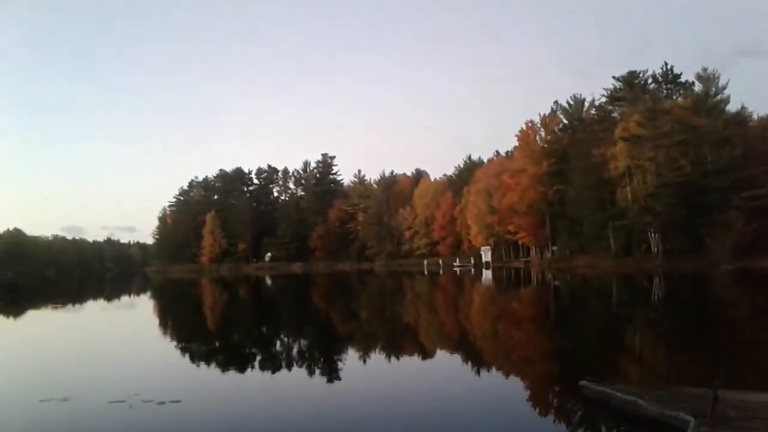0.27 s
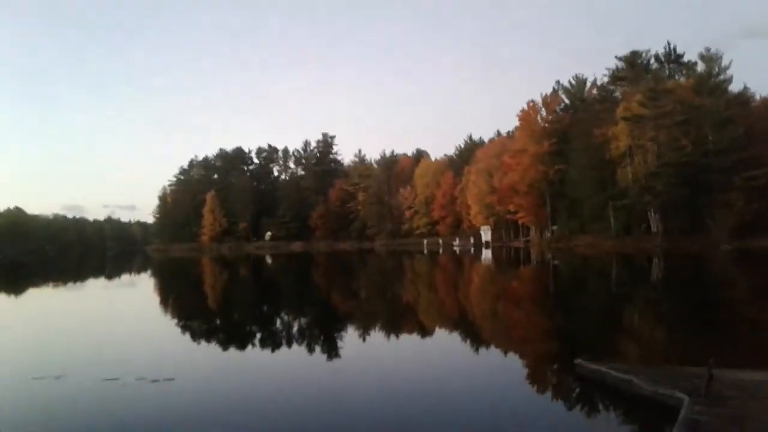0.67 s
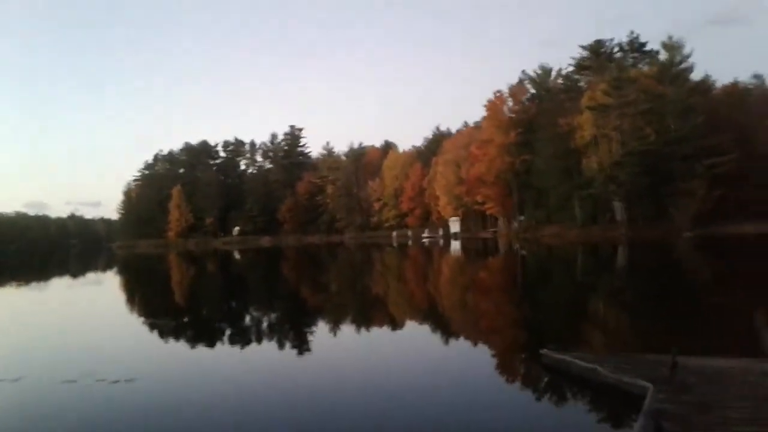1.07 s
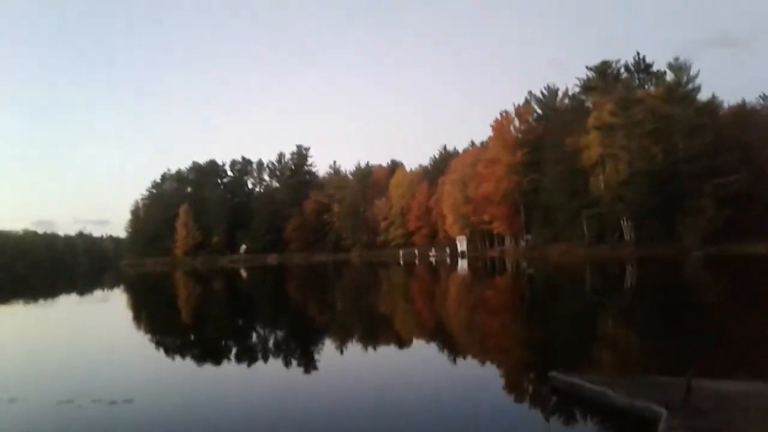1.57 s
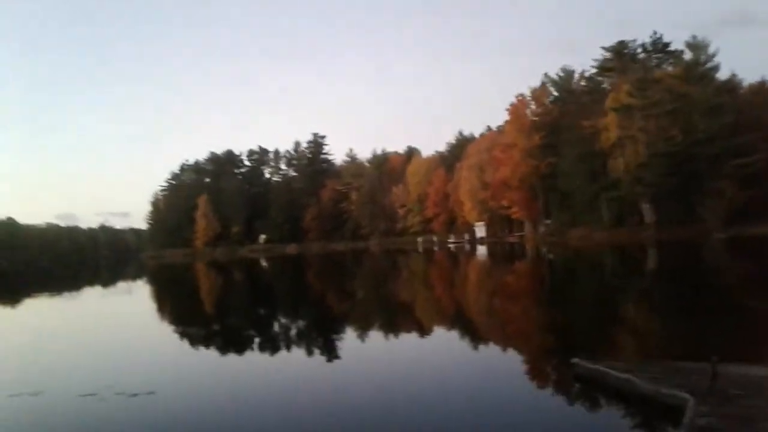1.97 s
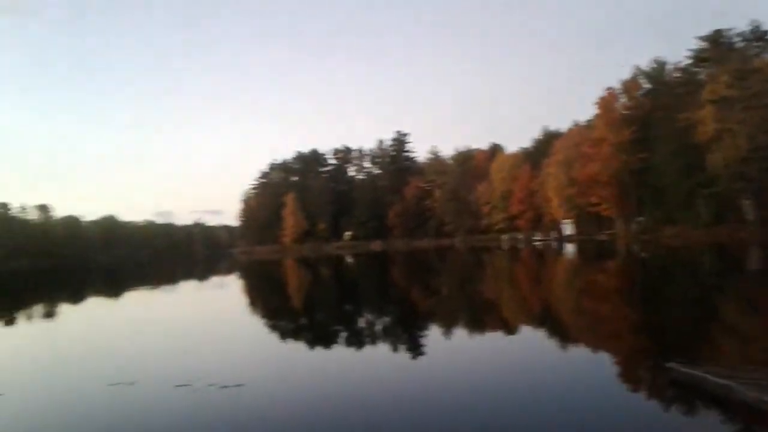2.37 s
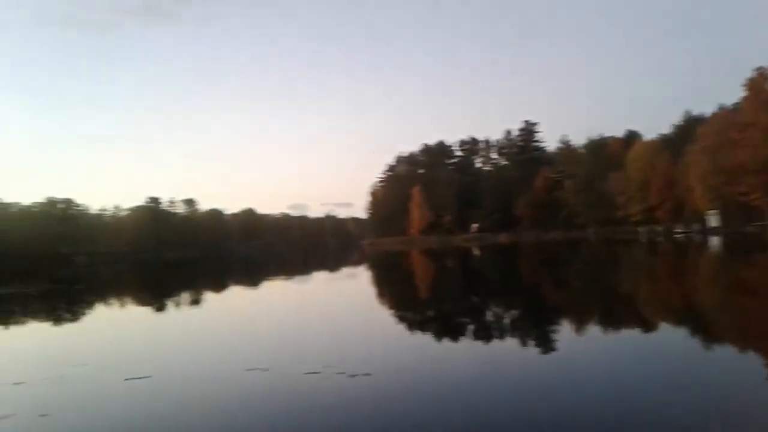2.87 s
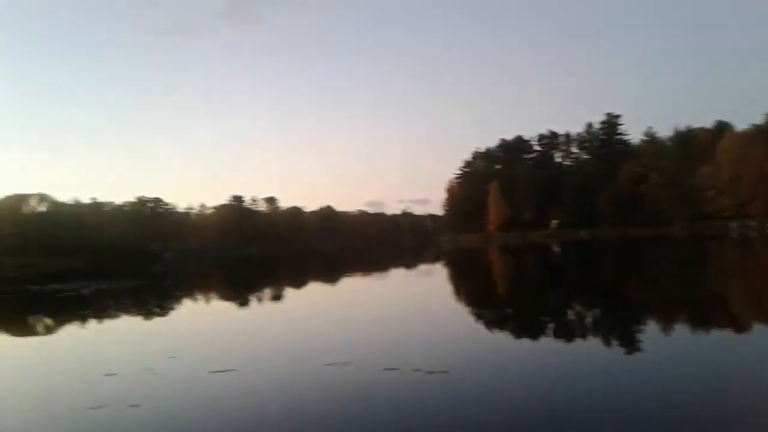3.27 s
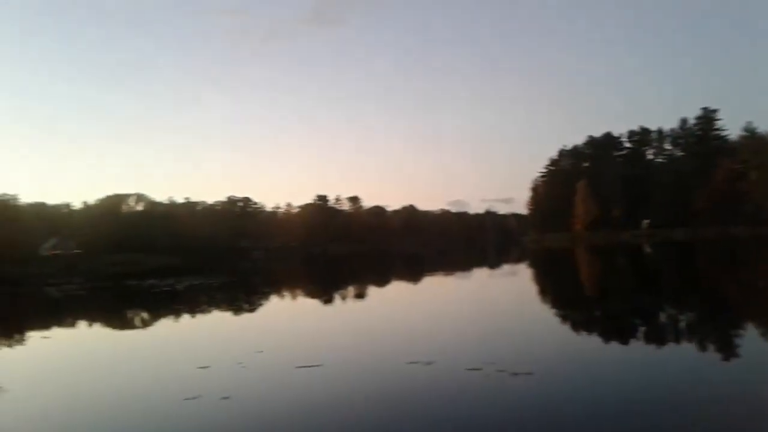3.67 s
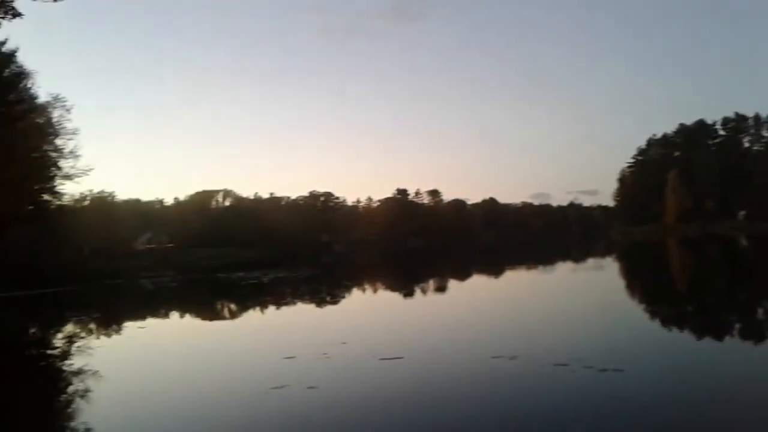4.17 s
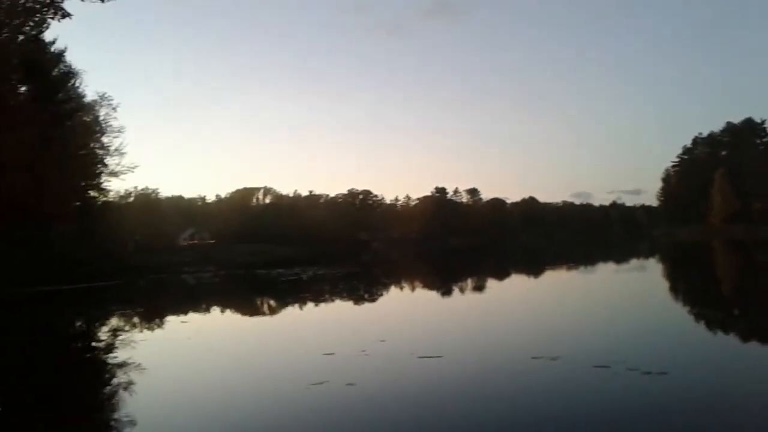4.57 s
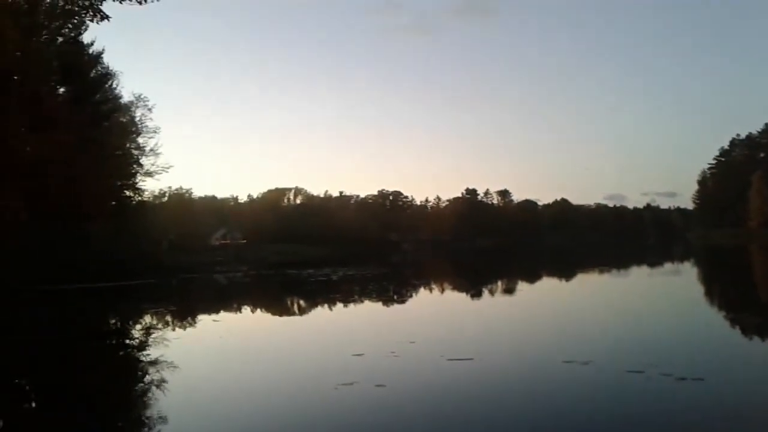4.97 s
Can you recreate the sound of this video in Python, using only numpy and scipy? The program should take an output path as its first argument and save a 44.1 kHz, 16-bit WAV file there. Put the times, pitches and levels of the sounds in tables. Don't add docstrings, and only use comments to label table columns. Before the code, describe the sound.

Far-off dog howling over quiet water: a breaking tail end, a hushed gap with faint chirp and ticks, then one long, cracking howl.

```python
import sys
import numpy as np
from scipy import signal
from scipy.fft import rfft, irfft
from scipy.io import wavfile
from scipy.ndimage import uniform_filter1d

SR = 44100
rng = np.random.default_rng(int(sys.argv[2]) if len(sys.argv) > 2 else 0)


def ratio_of_db(decibels):
    return 10 ** (np.asarray(decibels, float) / 20)


def store_wav(level_fs):
    pcm = np.round(np.clip(np.atleast_2d(level_fs), -1, 1) * 32767)
    wavfile.write(sys.argv[1], SR, pcm.T.astype(np.int16))


N = 230062
T = np.arange(N) / SR

# (t/s, pitch f/Hz, effort level/dB, second partial over first level/dB)
FIRST_HOWL = [(0, 503, -45, 1), (.2, 494, -50, -5), (.25, 500, -53, -5), (.29, 463, -49, 0),
              (.42, 445, -47, 7), (.47, 447, -47, 13)]
LONG_HOWL = [(2.25, 470, -42, 3), (2.34, 461, -44, 2), (2.54, 459, -46, 0), (2.6, 449, -44, 5),
             (2.95, 449.5, -44, 5)]
BROKEN_HOWL = [(3.02, 452, -47, -1), (3.15, 466, -46, 0), (3.82, 465, -45, 1), (3.96, 449, -45, 2),
               (4.26, 443, -46, 5), (4.4, 428, -48, -1), (4.52, 455, -47, 5)]
# (f/Hz, level/dB)
THROAT = [(100, 0), (230, -6), (350, 2.5), (450, 2), (570, -3), (690, 5), (900, 0.5), (1120, -2),
          (1240, -9), (1800, -6), (2100, -12), (2300, -25), (3400, -31), (5000, -32.5)]
# (f/Hz, width f/Hz, level/dB)
RINGS = [(691, 38, 7.5), (1171, 20.5, 8.5), (1997, 34, 5.5), (4120, 45, 3)]


def dog():
    held_hz, effort_db, upper_db = curve(FIRST_HOWL + LONG_HOWL + BROKEN_HOWL)
    tight = tension()
    shut = sum(np.clip((T - off) / .024, 0, 1) * (T < off + .3) for _, off, _ in HOWLS)
    fresh = sum(np.exp(-np.abs(T - on) / .3) * (T > on - .1) for on, *_ in HOWLS)

    upper_db = upper_db * (1 - shut)
    slack_db, push_db = -18 * (1 - tight), 9 * shut * (2 * tight - 1)
    first_db = effort_db - upper_db + slack_db + push_db + 3 * after_start(.053 / 2, 2 * .014)
    upper_db = upper_db + np.maximum(-150 * (1 - tight) ** 3, -24) + 14 * after_start(.053, .014)
    catch_late_s = .075
    catch_db = 32 * after_start(catch_late_s, .013)
    linger_db = 25.6 * fresh ** 2 * (T > HOWLS[1][0] + catch_late_s)
    half_db = -34 + np.maximum(catch_db, linger_db)

    slack_hz = 125
    smooth_hz = (slack_hz + (held_hz - slack_hz) * tight) * (1 + 0.003028 * walk(60))
    hz, lift_db = slips(smooth_hz)
    broken = np.minimum(2 * uniform_filter1d(1. * (hz > 1.08 * held_hz), size=3000, origin=1200), 1)
    hz = hz * (1 + .018 * broken * walk(150))
    lift_db = lift_db + 1.5 * broken * walk(90)

    third_db = -8 + .45 * upper_db + 18 * fresh * np.sqrt(tight) - 9 * broken
    bright_db = -12 + 1.5 * broken + .4 * upper_db + 5 * shut
    phase = 2 * np.pi * np.cumsum(hz) / SR
    rasp = after_start(.027, .014)
    voice = 0
    for k in [*range(1, 12), .5, 1.5, 2.5, 4.5]:
        db = on_log(k * hz, THROAT) + (0.21 + 0.3 * k) * walk(18)
        db = db + 24 * rasp * np.exp(-.5 * ((k * hz - 2280) / 200) ** 2)
        if k % 1:
            db = db + half_db
        if k == 2:
            db = db + upper_db
        if k == 3:
            db = db + third_db
        if k > 3:
            db = db + bright_db
        if k == 4:
            db = db - 8 * fresh * (3 * tight - 2)
        if k == 4.5:
            db = db + 14
        if k > 4:
            db = db - 7 + 15 * fresh * tight
        if k in (9, 11):
            db = db + 9 * tight ** 8 * (1 - broken)
        voice = voice + ratio_of_db(db) * np.sin(k * phase)
    voice = voice * ratio_of_db(first_db + lift_db) * voiced(.072, .085, .014)
    return voice + sum(ratio_of_db(db) * band(voice, f, width) for f, width, db in RINGS)


# (middle of rising glide t/s, pitch lets go t/s, falling time t/s)
HOWLS = [
    (-1, .47, .072),
    (2.132, 4.54, .05),
]


def tension():
    total = np.zeros(N)
    for on, off, fall in HOWLS:
        rise = (1 + np.tanh((T - on) / .017 / 2)) / 2
        settle = 1 - .1 * np.exp(-np.maximum(T - on, 0) / .06)
        let_go = np.exp(-(np.maximum(T - off, 0) / fall) ** 1.5)
        total += rise * settle * let_go
    return total


def voiced(early, late, width):
    total = np.zeros(N)
    for on, off, _ in HOWLS:
        opening = 1 + np.tanh((T - on + early) / width)
        closing = 1 + np.tanh((off + late - T) / width)
        total += opening * closing / 4
    return total


def after_start(late, width):
    return sum(np.exp(-.5 * ((T - on - late) / width) ** 2) for on, *_ in HOWLS)


# (t/s,
# level/dB)
QUICK_SLIPS = [(0.005, -1), (0.033, -1), (0.061, -1), (0.079, -1), (0.106, -1), (0.128, -2), (0.192, 0),
               (3.035, 2), (3.053, 4), (3.144, 0), (3.169, 3), (3.283, -2), (3.291, 2), (3.317, -6),
              (3.344, -1), (3.364, -6), (3.39, 1), (3.408, -3), (3.426, -1), (3.454, -2), (3.484, 2),
              (3.498, -4), (3.523, -3), (3.537, -2), (3.56, 0), (3.582, -6), (3.612, -1), (3.635, -6),
              (3.661, 0), (3.693, -6), (3.717, -5), (3.76, -3), (3.802, -6)]
# (t/s, level/dB, hold t/s)
STAYS = [
    (2.962, 3, .04),
    (3.075, 2, .015),
    (3.096, 3, .042),
    (3.2, 0, .04),
]


def slips(hz, climb=.016, dip=.12, recover=.006, flutter_hz=115, flutter=.19):
    hz, lift_db = hz.copy(), np.zeros(N)
    quick = [(s, db, .0064, 586) for s, db in QUICK_SLIPS]
    long = [(*row, 570) for row in STAYS]
    for s, db, hold, top_hz in sorted(quick + long):
        near = slice(max(int((s - .05) * SR), 0), int((s + .1) * SR))
        t = T[near] - s
        up = np.clip(t / climb + 1, 0, 1) ** 1.5 * (t < hold)
        under = dip * np.exp(-np.abs(t - hold) / recover) * (t >= hold)
        top = top_hz * (1 + flutter * np.sin(2 * np.pi * flutter_hz * t) * (t > 0))
        hz[near] = hz[near] * (1 - up - under) + top * up
        lift_db[near] = lift_db[near] * (1 - up) + up * db
    return uniform_filter1d(hz, size=60), uniform_filter1d(lift_db, size=60)


# (left t/s, right t/s, level/dB)
BANKS = [(.04, 0.038, -10.5), (.056, 0.067, -16), (.078, 0.074, -9.5), (0.104, 0.088, -12),
         (.135, .1362, -12.5), (.19, 0.13, -11), (.245, 0.2, -21), (0.309, 0.26, -18.5)]


def shore(x, woods_hz):
    lead = int(.25 * SR)
    before = np.concatenate([x[:lead], x])
    t = T[:int(1.5 * SR)]
    shared, left, right = rng.standard_normal((3, len(t)))
    fading = ratio_of_db(-60 * t / 1.4) * np.clip(t / 0.053, 0, 1)
    tail = (np.array([left, right]) + 1.9 * shared) * fading
    tail *= ratio_of_db(-12) / np.sqrt(np.mean(np.sum(tail ** 2, axis=1)))
    banks = np.zeros_like(tail)
    for left_s, right_s, db in BANKS:
        banks[[0, 1], [int(left_s * SR), int(right_s * SR)]] = ratio_of_db(db)
    near = t < .07
    dull = signal.lfilter(*signal.butter(3, woods_hz, fs=SR), tail + banks * ~near)
    response = banks * near + dull
    return signal.fftconvolve(before[None], response, axes=1)[:, lead:lead + N]


# (top of the arch t/s, top f/Hz, level/dB, rise t/s, fall t/s)
CHIRPS = [
    (.624, 3830, -75, .027, .024),
    (2.757, 3860, -66, .033, .031),
    (4.203, 3760, -65, .019, .022),
]


def bird():
    out = np.zeros(N)
    for s, top_hz, db, rise, fall in CHIRPS:
        place = np.clip(np.where(T < s, (T - s) / rise, (T - s) / fall), -1, 1)
        drop_hz = np.where(T < s, 1200, 780)
        arch = np.minimum(np.abs(T - s) / .03, 1.2) ** 1.6
        hz = top_hz - drop_hz * arch + 60 * walk(300)
        shape = (1 - place ** 4) * ratio_of_db(db + 3 * place + 4.0 * walk(250))
        out += np.sqrt(2) * shape * np.sin(2 * np.pi * np.cumsum(hz) / SR)
    return out


# (t/s, peak level/dB, f/Hz, width f/Hz, decay t/s)
TICKS = [(.117, -52, 2400, 1100, .012), (1.1, -63, 1800, 1200, .06), (1.4835, -52, 2500, 2200, .01),
         (1.5555, -53, 290, 200, .04), (1.5588, -53, 2200, 2800, .012), (1.7629, -55, 4600, 1200, .012),
         (1.7633, -55, 3000, 1000, .012), (1.99, -55, 2200, 1300, .09)]


def ticks():
    out = np.zeros(N)
    t = T[:int(.12 * SR)]
    for s, db, hz, width, decay_s in TICKS:
        noise = rng.standard_normal(len(t)) * ratio_of_db(-60 * t / decay_s)
        burst = band(band(noise, hz, width), hz, width)
        out[int(s * SR):][:len(t)] += ratio_of_db(db) * burst / np.abs(burst).max()
    return out * ratio_of_db(np.array([[-1.5], [1.5]]))


# (f/Hz, level per Hz/dB)
AIR_MID = [(15, -32), (25, -23), (91, -7.5), (178, -6.5), (253, -9.5), (297, -10), (331, -9.5), (469, -5.5),
           (614, -13.5), (703, -11.5), (826, -12.5), (2930, -22.5), (3930, -29), (5150, -27.5),
           (15500, -27)]
# (f/Hz, level per Hz/dB)
AIR_SIDE = [(15, -65), (25, -39), (79, -7.5), (163, -10), (202, -5), (326, -14.5), (394, -9.5),
            (833, -14.5), (927, -14.5), (1310, -16.5), (2300, -20), (4040, -29), (5720, -26.5),
            (10600, -47), (15000, -49)]


def air():
    mid, side = coloured(AIR_MID, -68.5), coloured(AIR_SIDE, -71)
    lift_db = 1.5 + 3.5 * voiced(-.04, .14, .05) + .5 * walk(3.267)
    return (mid * ratio_of_db(np.array([[-1.6], [1.6]])) + side * np.array([[1], [-1]])) * ratio_of_db(lift_db)


def curve(rows):
    s, *columns = np.transpose(rows)
    return [np.interp(T, s, c) for c in columns]


def on_log(hz, rows):
    f, db = np.transpose(rows)
    return np.interp(np.log(np.maximum(hz, 1)), np.log(f), db)


def band(x, hz, width):
    return signal.lfilter(*signal.iirpeak(hz, hz / width, fs=SR), x)


def walk(rate):
    k = int(SR / rate)
    steps = np.repeat(rng.standard_normal(N // k + 1), k)
    return 1.46 * uniform_filter1d(uniform_filter1d(steps, k), k)[:N]


def coloured(rows, db):
    weights = ratio_of_db(on_log(np.fft.rfftfreq(N, 1 / SR), rows))
    x = irfft(rfft(rng.standard_normal(N)) * weights, N)
    return x * ratio_of_db(db) / np.std(x)


def scene():
    far = dog()
    far = far + shore(far, woods_hz=560)
    far[0] = np.interp(T - .00028 - .00003 * T, T, far[0])
    far = far * ratio_of_db(np.array([[-.4], [.4]]))
    chirps = bird()
    return far + chirps + ratio_of_db(-4) * shore(chirps, woods_hz=4973) + ticks() + air()


def top_cut(x):
    return signal.sosfilt(signal.butter(12, 15660, fs=SR, output="sos"), x)


def record(dry):
    mix = dry - .0005
    return top_cut(mix)


dry = scene()
out = record(dry)
store_wav(out)
```